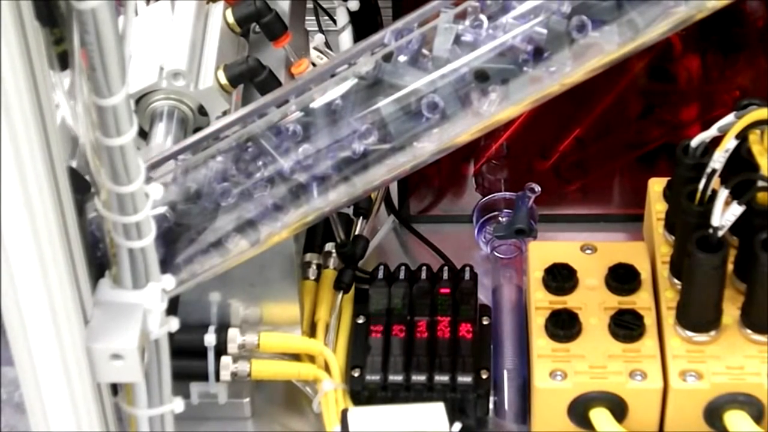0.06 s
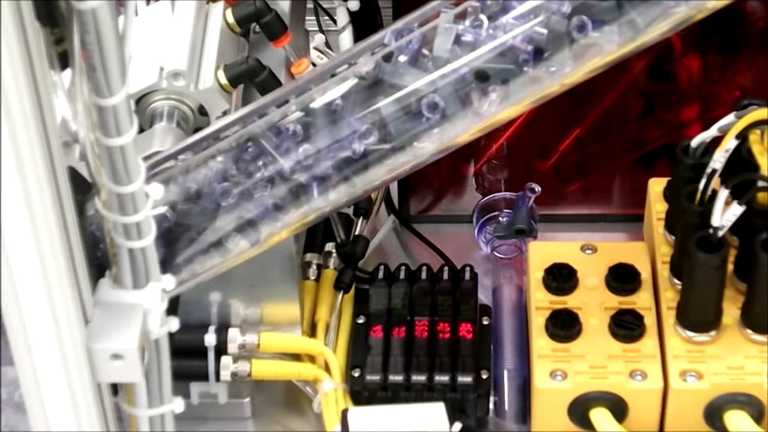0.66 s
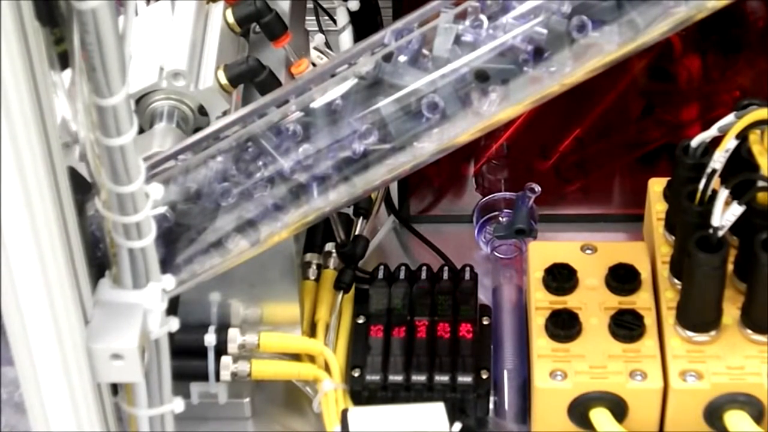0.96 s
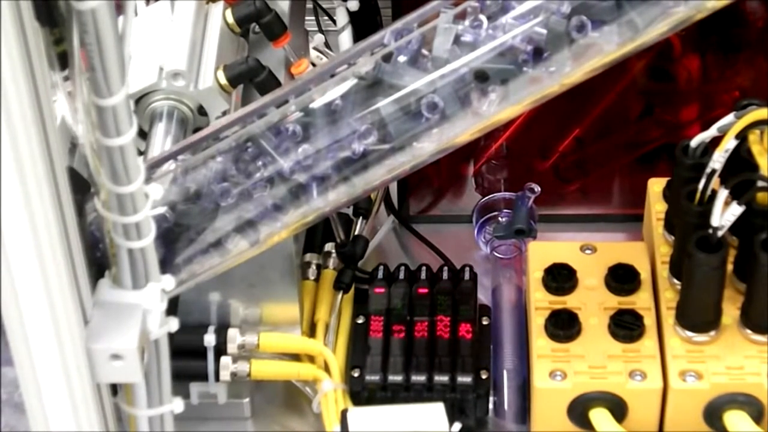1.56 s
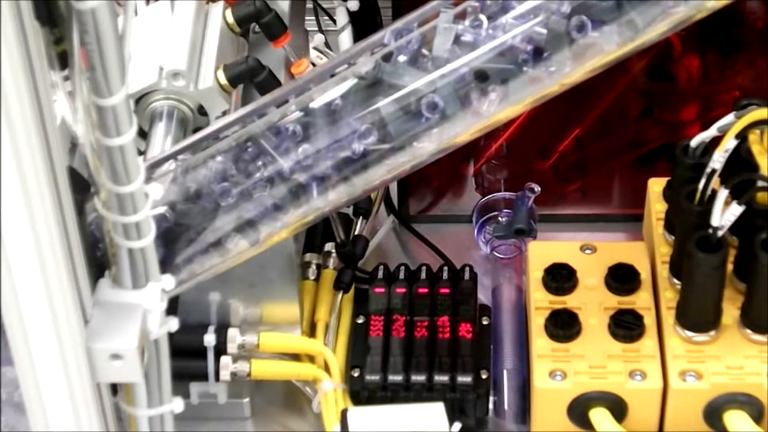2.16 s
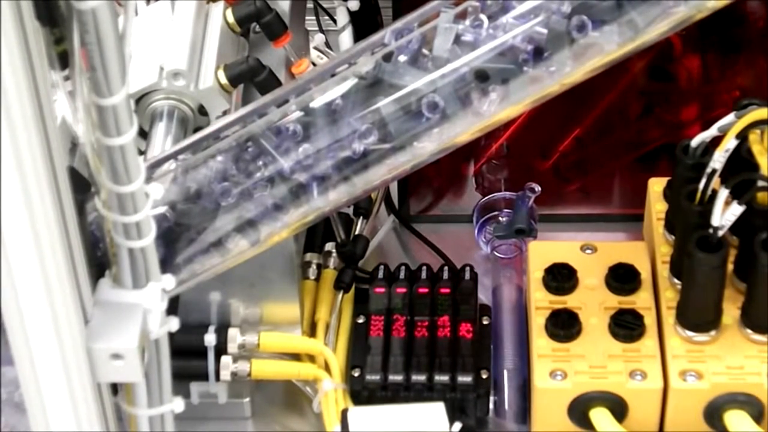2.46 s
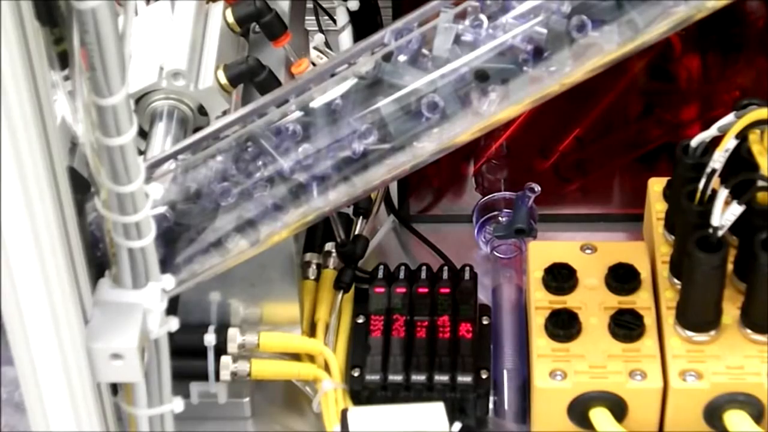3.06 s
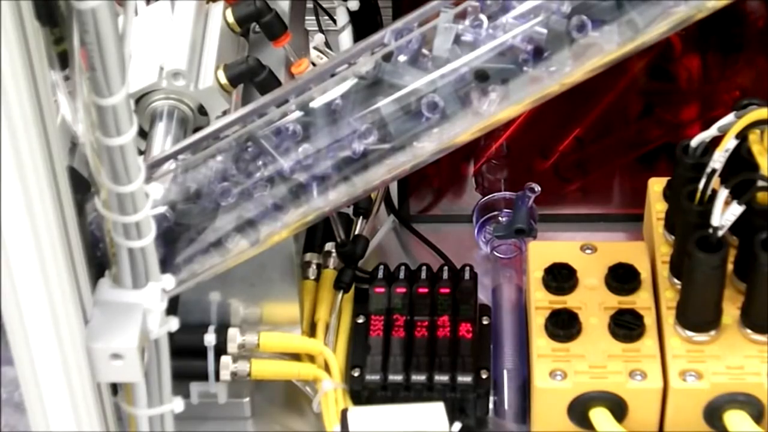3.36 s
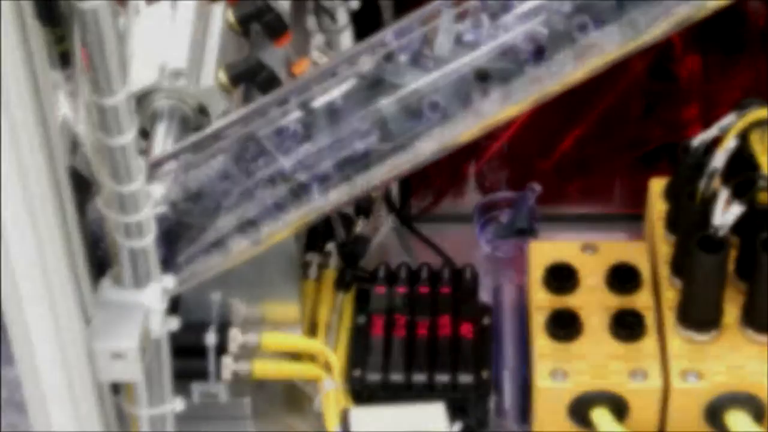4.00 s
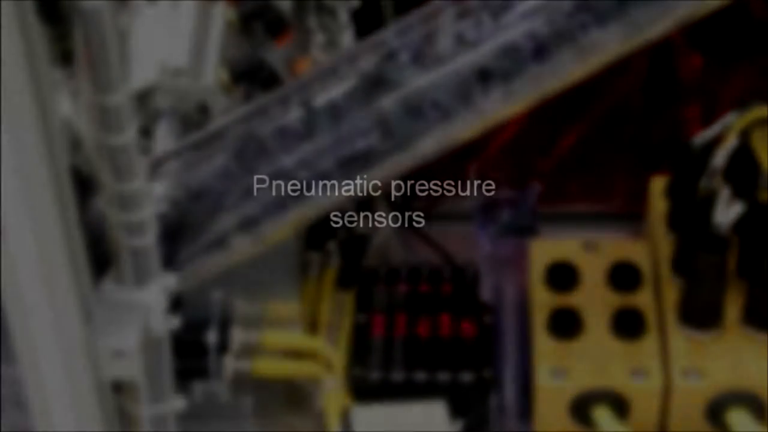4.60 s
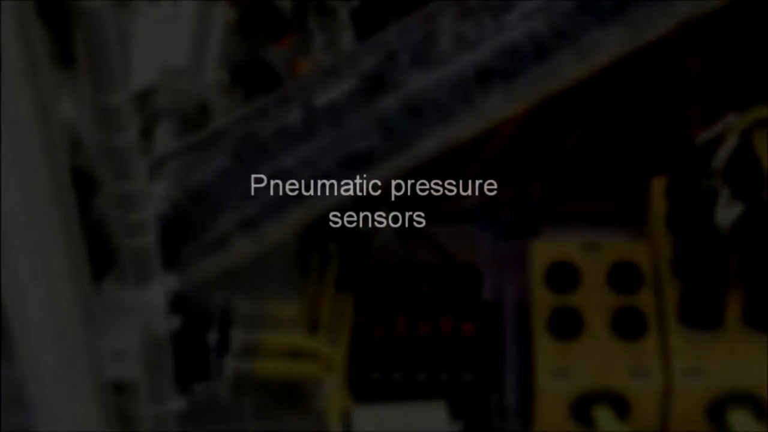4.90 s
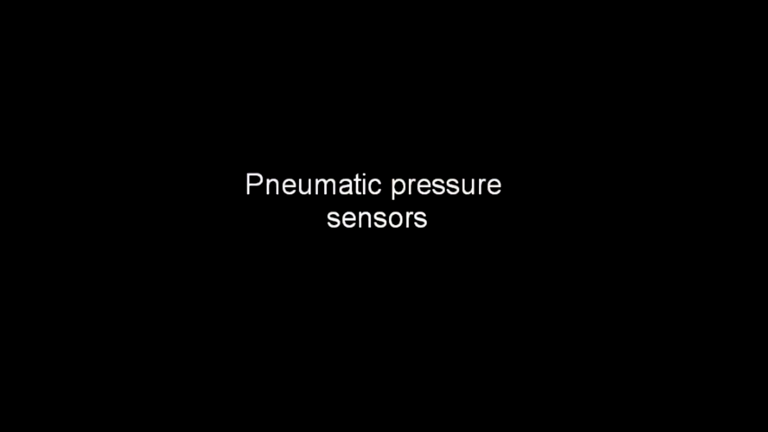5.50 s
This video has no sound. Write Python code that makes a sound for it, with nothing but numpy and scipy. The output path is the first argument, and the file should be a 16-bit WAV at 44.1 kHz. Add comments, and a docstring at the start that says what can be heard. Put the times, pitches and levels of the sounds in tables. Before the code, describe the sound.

An automatic assembly machine runs close to the microphone in a hall. A low, wavering motor hum and a wash of fan noise continue throughout, with a faint high whine and a soft rustle of small plastic parts. At about 0.6 seconds an air valve opens with a strong thump and a short hiss, followed by a clack and a soft hollow thud. Between 1.0 and 1.3 seconds comes a quick cluster of clacks, ticks and two more air bursts, with the sharpest, loudest clack near its start. At about 2.1 seconds a slide clacks and a panel thuds. Another valve thumps and hisses at 3.2 seconds. From 4.1 to 4.4 seconds there are a few faint ticks and one dull thud. The hits have a short reverberant tail. The hum carries on until the sound stops at about 5.3 seconds.

```python
"""An automatic assembly machine works close to the microphone, in a hall.
Its motors and vibrating parts feeder lay a bed of hum over fan noise and a thin electronic whine.
On top, air valves vent with a thump and a hiss, solenoids snap, slides clack against their stops,
panels thud and small parts tick. A limiter ducks the bed after the hardest blows,
and the sound cuts off shortly before the end."""
import sys
import numpy as np
from scipy import signal
from scipy.fft import rfft, irfft
from scipy.io import wavfile
from scipy.ndimage import uniform_filter1d

SR = 44100
rng = np.random.default_rng(int(sys.argv[2]) if len(sys.argv) > 2 else 0)


def int16_out(signal):
    """Quantize to a 16-bit WAV file."""
    q = np.round(np.clip(np.atleast_2d(signal).T, -1, 1) * 32767)
    wavfile.write(sys.argv[1], SR, q.astype(np.int16))


N = 249165
CUT_S = 5.281
AIR_LEAD_S = .04  # air starts to seep this long before a valve opens

# hum of the motors, feeder and shaking frame: f/Hz, rms level/dB, waver/share of the amplitude
HUM_TONES = [(6.866, -31.5, 0.59), (21.216, -26.5, 0.17), (22.2, -31, .3), (29.7, -29, 0.13),
             (30.996, -30, .2), (57.9, -26, 0.28), (108.67, -26.5, 0.18), (108.5, -42, 1),
             (117.9, -39.5, 1), (147.9, -41.5, 0.43), (173.8, -39.5, .5), (170.3, -42.5, 0.13),
             (225.5, -45.5, .2)]
# whine of a switching drive with its sidebands: f/Hz, rms level/dB
WHINE_TONES = [(8629, -78), (10471, -90.5), (10551, -83.5), (10632, -86.5), (10713, -75), (10756, -86),
               (10794, -72), (10877, -87)]
# tone colour of the fans and air flow: f/Hz, relative level/dB
FAN_SPECTRUM = [(12, -3), (37, 6.5), (50, -4.5), (125, -1.5), (200, -2.5), (300, -3.5), (700, -11),
                (1250, -21), (2350, -24), (3400, -33.5), (4400, -45.5), (7600, -47.5), (8600, -43),
                (10500, -54.5), (15500, -58)]
# stereo width of the fans: f/Hz, side level against mid/dB
FAN_WIDTH = [(100, -64), (350, -66), (1400, -28.5), (2800, -30), (6000, -12), (8600, -13.5), (12000, -5)]
# valve cues: t/s, thump gain/dB, hiss gain/dB, hose gain/dB, hiss t60/s,
# leak against hiss/dB, whistle f/Hz, whistle against hiss/dB
VALVE_CUES = [(0.6378, 0.5, -15, -32.5, 0.05, -35.5, 10200, -18.5),
              (1.1754, -7, -14.5, -30, 0.02, -19, 6750, -11),
              (1.3183, -3.5, -17.5, -22.5, 0.057, -7, 10000, -25),
              (3.1773, -3, -18, -22.5, 0.068, -7.5, 10500, -21.5)]
# air leaving the silencer: f/Hz, relative level/dB
EXHAUST_SPECTRUM = [(150, 15), (700, 8), (1600, -3.5), (2200, 6), (2800, 5), (3400, -2.5), (4500, -10.5),
                    (6600, -1), (8700, -11.5), (10100, -2), (12300, -13.5), (14000, -9.5), (16000, -29.5),
                    (18000, -49)]
# the frame's dense response to a blow: f/Hz, relative level/dB
FRAME_SPECTRUM = [(80, -7.5), (350, 7), (1000, 6.5), (1500, 0.5), (1750, -4), (2100, 7), (2500, -2),
                  (2850, -2.5), (3500, -15.5), (4500, -13.5), (6000, -5), (8000, -12.5), (10000, 1),
                  (12500, -7.5), (14300, -0.5), (17000, -18)]
# the frame's clear modes: f/Hz, relative level/dB, t60/s
FRAME_MODES = [(420, -4, .11), (700, -8, .1), (1052, 0, .07), (1338, -5, .09), (1610, -2, .06),
               (2125, -7, .04), (2407, -12, .05), (2563, -13, .05), (2829, -6, .036), (4910, -24, .05),
               (5389, -20, .04), (5945, -10, .035), (9681, -5, .04)]
# solenoids pulling in before a stroke: t/s, level/dB, t60/s
SOLENOID_CUES = [(0.622, -37, .04), (1.022, -37, .04), (2.066, -33.5, .12)]
# the enclosure booming under a puff of air: f/Hz, relative level/dB, t60/s
BOOM_MODES = [(135.8, -9, 0.088), (203, -17, .07), (330, -7.5, 0.042), (434, -26, 0.013), (566, -26, 0.027)]
# slides hitting their stops: t/s, level/dB, treble corner f/Hz, note f/Hz,
# then relative to the blow: note/dB, graze/dB, rebound/dB, hall send/dB
SLIDE_CUES = [(0.7005, -14.5, 1900, 702, -2.5, -8, -7.5, -13.5),
              (1.0299, -13, 1330, 640, 4, -27, -20, -14.5), (1.048, 0, 5100, 1052, -7, -8, -5, -19),
              (1.163, -13.5, 1910, 1485, -7.5, -15, -20, -25.5),
              (1.2535, -20, 1830, 1093, 1, -10.5, -14, -15),
              (2.0712, -13.5, 2980, 2184, -5.5, -11.5, -5.5, -10.5)]
# panels jolted by a moving load: t/s, level/dB, note f/Hz, hall send/dB
PANEL_CUES = [(0.746, -22.5, 170, -3), (2.078, -15, 401, -5.5), (4.337, -18.5, 242.5, -8.5)]
# small parts dropping into place or shaken loose: t/s, level/dB, treble corner f/Hz
TICK_CUES = [(1.087, -19, 1600), (1.102, -17.5, 1930), (1.658, -35, 2610), (2.549, -43, 3500),
             (4.132, -29, 2370), (4.337, -38, 3200), (4.388, -39, 3340), (4.409, -40, 3360)]
# decay of the hall: f/Hz, t60/s
HALL_DECAY = [(250, .9), (700, .72), (2000, .47), (5000, .44), (9500, .4), (15000, .27)]
# stereo width of the hits: f/Hz, side level against mid/dB
HIT_WIDTH = [(100, -59.5), (700, -41.5), (2800, -20), (6000, -10), (12000, -21)]
# lead of the right microphone port over the left: f/Hz, phase/rad
PORT_LEAD = [(150, .001), (500, 0.0067), (1500, 0.19), (2700, 0.49), (6000, 0.69), (8700, 1.27),
             (13000, 1.8)]


def amp(db):
    """Decibels to gain."""
    return 10 ** (np.asarray(db) / 20)


def unit_rms(x):
    """Scales to an rms of one."""
    return x / np.sqrt(np.mean(x ** 2) + 1e-20)


def unit_hit(x):
    """Scales a short sound to the energy of 10 ms at an rms of one."""
    return x / np.sqrt(np.sum(x ** 2) / (SR / 100) + 1e-20)


def decay(t, t60):
    """Exponential fade, 60 dB down after t60."""
    return np.exp(-np.log(1000) * t / t60)


def curve(points, hz):
    """Reads a table on a logarithmic frequency axis."""
    f, value = np.transpose(points)
    return np.interp(np.log(hz + 1), np.log(f + 1), value)


def add(mix, s, sound):
    """Mixes a sound in at s seconds."""
    part = mix[round(s * SR):][:len(sound)]
    part += sound[:len(part)]


def noise(spectrum, size):
    """Noise of a given tone colour, at an rms of one."""
    gain = amp(curve(spectrum, np.fft.rfftfreq(size, 1 / SR)))
    return unit_rms(irfft(rfft(rng.standard_normal(size)) * gain, size))


def drift(rate_hz):
    """A slow random modulator, at an rms of one."""
    hz = np.fft.rfftfreq(N, 1 / SR)
    hz = hz[hz < 20]
    slow = (rng.standard_normal(len(hz)) + 1j * rng.standard_normal(len(hz))) / (1 + (hz / rate_hz) ** 2)
    slow[0] = 0
    wander = irfft(slow, 2048)
    return unit_rms(np.interp(np.linspace(0, len(wander) - 1, N), np.arange(len(wander)), wander))


def eq(x, db_of, size=4096):
    """Minimum-phase EQ whose gain in dB is a function of frequency."""
    log_gain = np.log(amp(db_of(abs(np.fft.fftfreq(size, 1 / SR)))) + 1e-6)
    taps = np.fft.ifft(np.exp(np.conj(signal.hilbert(log_gain)))).real[:size // 2]
    return signal.fftconvolve(x, taps)[:len(x)]


def ring(modes, t):
    """Fading modes, each struck with a random polarity."""
    return sum(amp(db) * decay(t, t60) * np.sin(2 * np.pi * hz * t) * rng.choice([-1, 1])
               for hz, db, t60 in modes)


def drives(waver_hz=2.1):
    """The drives hum in low, wavering tones under a steady switching whine."""
    t, hum = np.arange(N) / SR, np.zeros(N)
    for hz, db, depth in HUM_TONES:
        waver = 1 + depth * (drift(waver_hz) + 1j * drift(waver_hz)) / np.sqrt(2)
        hum += amp(db) * np.real(waver * np.exp(2j * np.pi * (hz * t + rng.random())))
    whine = sum(amp(db) * np.cos(2 * np.pi * (hz * t + rng.random())) for hz, db in WHINE_TONES)
    return np.sqrt(2) * (hum + whine)


def fans(level_db=-26, flutter_db=-0.88, shaft_hz=27.9, throb_depth=0.06, body_hz=3800):
    """A wash of air, as mid and side; its body flutters and throbs with each turn of the motor shaft."""
    t, hz = np.arange(N) / SR, np.fft.rfftfreq(N, 1 / SR)
    air, side_air = noise(FAN_SPECTRUM, N), noise(FAN_SPECTRUM, N)
    body = irfft(rfft(air) / (1 + (hz / body_hz) ** 8), N)
    throb = 1 + throb_depth * np.cos(2 * np.pi * shaft_hz * t)
    flutter = amp(flutter_db * drift(rate_hz=18))
    mid = air + body * (flutter * throb - 1)
    side = irfft(rfft(side_air) * amp(curve(FAN_WIDTH, hz)), N)
    return amp(level_db) * np.array([mid, side])


def feeder(grains=508, level_db=-51, t60=.03, band_hz=(900, 2900)):
    """Small plastic parts jostle in the feed chute: a soft, grainy rustle."""
    t, rustle = np.arange(SR // 10) / SR, np.zeros(N)
    for when, size in rng.random((grains, 2)):
        add(rustle, when * CUT_S, size * rng.standard_normal(len(t)) * decay(t, t60))
    chute = signal.butter(4, band_hz, "bandpass", fs=SR, output="sos")
    return amp(level_db) * unit_rms(signal.sosfilt(chute, rustle))


def valves(air_send_db=-13, thump_send_db=-12, spool_db=-14.5):
    """Each valve thumps, its spool cracks, and the air rushes out."""
    for s, thump_db, hiss_db, hose_db, *hiss_shape in VALVE_CUES:
        spool = clack(thump_db + spool_db, corner_hz=2540, bass_db=-2, t60=0.014,
                      modes_db=-26, note_hz=2140, note_db=-11.5)
        yield s, amp(thump_db) * thump() + spool, thump_send_db
        air = amp(hiss_db) * hiss(*hiss_shape) + amp(hose_db) * hose()
        yield s - AIR_LEAD_S, air, air_send_db


def hiss(t60, leak_db, whistle_hz, whistle_db, open_s=0.007, hold_s=0.011, leak_s=0.03,
         drain_db=-15, width_hz=380, dull_hz=4500):
    """Air seeps past the moving spool, bursts out, then drains from the hose with a duller sound."""
    t = np.arange(SR // 2) / SR - AIR_LEAD_S
    after, hz = np.maximum(t, 0), np.fft.rfftfreq(len(t), 1 / SR)
    opening = 1 - np.exp(-after / open_s)
    resonance = 1 / (1 + ((hz - whistle_hz) / width_hz) ** 2)
    whistle = unit_rms(irfft(rfft(rng.standard_normal(len(t))) * resonance, len(t)))
    jet = noise(EXHAUST_SPECTRUM, len(t))
    # only the full blast whistles; slow air has little treble
    blast = opening * decay(np.maximum(t - hold_s, 0), t60) * (jet + amp(whistle_db) * whistle)
    slow_air = irfft(rfft(jet) / (1 + (hz / dull_hz) ** 2), len(t))
    leak = amp(leak_db) * np.exp(-abs(t) / leak_s)
    drain = amp(drain_db) * opening * decay(after, t60=0.26)
    return blast + (leak + drain) * slow_air


def hose(start_hz=2100, end_hz=2750, glide_s=0.011, width_hz=480, swell_s=0.011, t60=0.13):
    """Air in the hose sings in a broad band that swells into the stroke, sweeps up and fades."""
    t = np.arange(SR // 2) / SR - AIR_LEAD_S
    hz = np.fft.fftfreq(len(t), 1 / SR)
    white = rng.standard_normal(len(t)) + 1j * rng.standard_normal(len(t))
    flutter = np.fft.ifft(white / (1 + (hz / width_hz) ** 2) ** 1.2)
    pitch_hz = start_hz + (end_hz - start_hz) * (1 + np.tanh(t / glide_s)) / 2
    rush = unit_rms((flutter * np.exp(2j * np.pi * np.cumsum(pitch_hz) / SR)).real)
    return rush * np.exp(np.minimum(t, 0) / swell_s) * decay(np.maximum(t, 0), t60)


def solenoids(send_db=-3):
    """Steel armatures pull in with a thin, bright snap."""
    for s, level_db, t60 in SOLENOID_CUES:
        snap = clack(level_db, corner_hz=5720, bass_db=-6.5, t60=t60,
                     modes_db=-26, note_hz=5740, note_db=-12.5)
        yield s, snap, send_db


def clack(level_db, corner_hz, bass_db, t60, modes_db, note_hz, note_db, note_t60=0.071, rise_s=0.001):
    """A blow chatters into the frame and the struck part rings; harder contact has a higher corner."""
    t = np.arange(SR // 3) / SR
    chatter = rng.standard_normal(len(t)) * decay(t, t60)
    body = unit_hit(eq(chatter, lambda f: curve(FRAME_SPECTRUM, f)))
    frame = body + amp(modes_db) * unit_hit(ring(FRAME_MODES, t))
    # bass shelf and treble roll-off
    struck = eq(frame, lambda f: bass_db / (1 + (f / 800) ** 2) - 10 * np.log10(1 + (f / corner_hz) ** 5))
    note = unit_hit(np.sin(2 * np.pi * note_hz * t) * decay(t, note_t60))
    attack = 1 - np.exp(-t / rise_s)
    return amp(level_db) * unit_hit((unit_hit(struck) + amp(note_db) * note) * attack)


def thump(swing_s=.0007, boom_db=-2, rebound_db=-6, rebound_s=0.0046):
    """The valve snaps open: one pressure swing, its rebound off the guard, and the enclosure's boom."""
    t = np.arange(SR // 3) / SR
    u = t / swing_s
    swing = -1.9 * u * (1 - u / 2.2) * np.exp(-u ** 2 / 4)
    punch = swing + amp(boom_db) * ring(BOOM_MODES, t) * (1 - np.exp(-u / 2))
    add(punch, rebound_s, amp(rebound_db) * swing)
    return punch


def slides(graze_ahead_s=.0043, rebound_after_s=.01):
    """Each slide grazes its stop, lands on it and rebounds once, more lightly."""
    for s, level_db, corner_hz, note_hz, note_db, graze_db, rebound_db, send_db in SLIDE_CUES:
        graze = clack(level_db + graze_db, corner_hz=2900, bass_db=-7.5, t60=0.017,
                      modes_db=-10.5, note_hz=2770, note_db=-5.5)
        blow = clack(level_db, corner_hz, bass_db=-12.5, t60=0.037,
                     modes_db=-8, note_hz=note_hz, note_db=note_db)
        rebound = clack(level_db + rebound_db, corner_hz, bass_db=-4.5, t60=0.049,
                        modes_db=-8, note_hz=429, note_db=-2)
        yield s - graze_ahead_s, graze, send_db
        yield s, blow, send_db
        yield s + rebound_after_s, rebound, send_db


def panels():
    """A soft push makes a panel thud, hollow, at its own note."""
    for s, level_db, note_hz, send_db in PANEL_CUES:
        thud = clack(level_db, corner_hz=530, bass_db=10, t60=.2,
                     modes_db=-20, note_hz=note_hz, note_db=4, note_t60=0.035)
        yield s, thud, send_db


def ticks(send_db=-13, t60=0.046, low_cut_hz=700):
    """Light plastic parts tap once: little bass, and a top end that falls away steeply."""
    t = np.arange(SR // 4) / SR
    for s, level_db, corner_hz in TICK_CUES:
        contact = rng.standard_normal(len(t)) * decay(t, t60)
        tap = eq(contact, lambda f: -10 * np.log10(1 + (f / corner_hz) ** 10)
                 - 10 * np.log10(1 + (low_cut_hz / (f + 1)) ** 2))
        yield s, amp(level_db) * unit_hit(tap), send_db


def hall(x, build_s=0.015):
    """A diffuse reverb tail that darkens as it fades."""
    hz, t, bands = signal.stft(rng.standard_normal(SR), SR, nperseg=256)
    tail = signal.istft(bands * decay(t, curve(HALL_DECAY, hz)[:, None]), SR, nperseg=256)[1]
    tail *= 1 - np.exp(-np.arange(len(tail)) / SR / build_s)
    return signal.fftconvolve(x, tail / np.linalg.norm(tail))[:N]


def scatter(x, t60=0.038):
    """Side signal of the hits: near surfaces scatter the treble differently to each port."""
    t = np.arange(SR // 10) / SR
    echoes = rng.standard_normal(len(t)) * decay(t, t60)
    width = amp(curve(HIT_WIDTH, np.fft.rfftfreq(N, 1 / SR)))
    return irfft(rfft(x) * rfft(echoes / np.linalg.norm(echoes), N) * width, N)


def microphone(mid, side):
    """Two closely spaced ports, left and right: treble reaches the right one first."""
    lag = np.exp(-.5j * curve(PORT_LEAD, np.fft.rfftfreq(N, 1 / SR)))
    return irfft(np.array([rfft(mid + side) * lag, rfft(mid - side) / lag]), N)


def scene():
    """Hits and air blasts, each with its own hall tail, over the bed of the running machine."""
    hits = np.zeros(N)
    for source in slides, solenoids, ticks, panels, valves:
        for s, sound, send_db in source():
            add(hits, s, sound)
            add(hits, s, amp(send_db) * hall(sound))
    fan_mid, fan_side = fans()
    return microphone(hits + feeder() + drives() + fan_mid, scatter(hits) + fan_side)


def record(dry, ceiling_db=0.0, release_db_per_s=65, fade_s=.003, high_cut_hz=15850):
    """Master chain: a fast peak limiter with a slow release, the cut to silence, and a steep low-pass."""
    t = np.arange(N) / SR
    peak_db = 20 * np.log10(abs(dry).max(0) + 1e-9)
    release_db = t * release_db_per_s
    held_db = np.maximum.accumulate(peak_db + release_db) - release_db
    duck_db = uniform_filter1d(np.maximum(held_db - ceiling_db, 0), size=16)
    limited = np.clip(dry / amp(duck_db), -1, 1)
    gate = np.clip(np.minimum(t, CUT_S - t) / fade_s, 0, 1)
    low_pass = signal.firwin(511, high_cut_hz, window=("kaiser", 9), fs=SR)
    return signal.oaconvolve(limited * gate, low_pass[None], "same")


dry = scene()
out = record(dry)
int16_out(out)
```